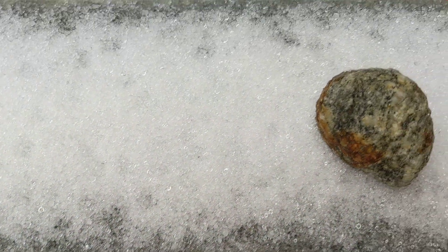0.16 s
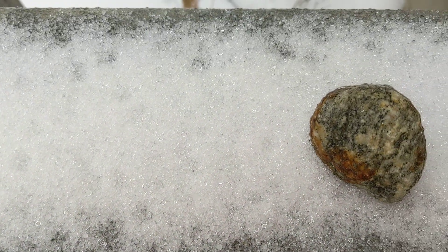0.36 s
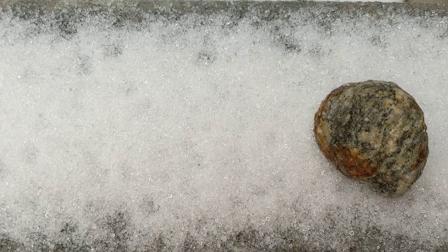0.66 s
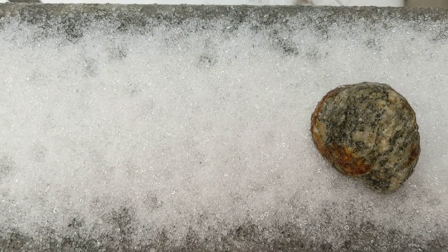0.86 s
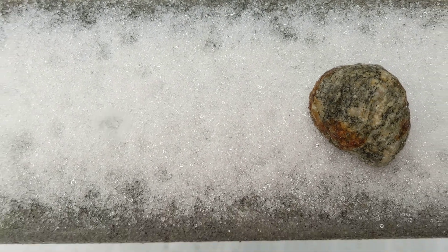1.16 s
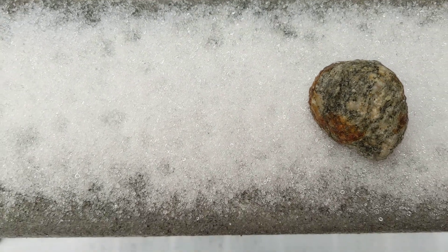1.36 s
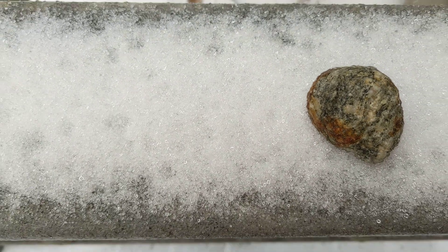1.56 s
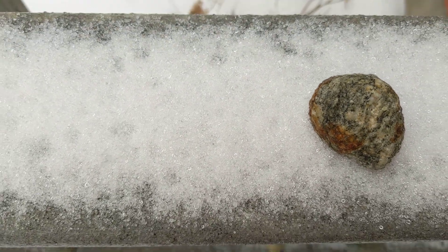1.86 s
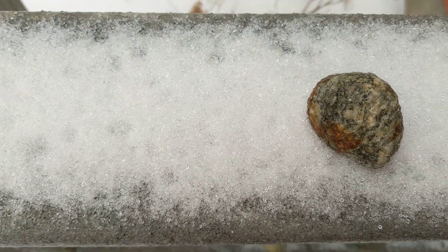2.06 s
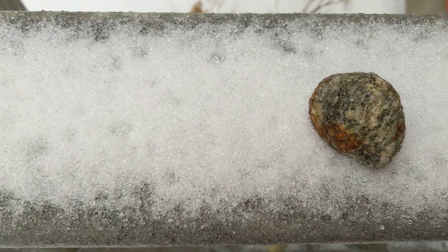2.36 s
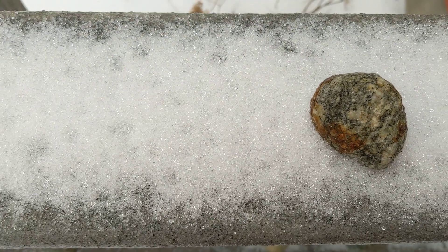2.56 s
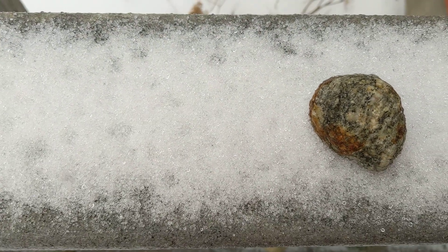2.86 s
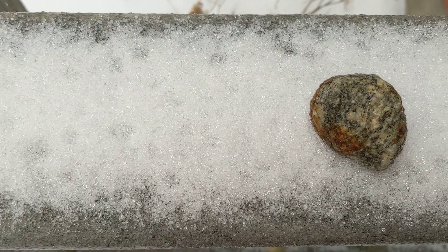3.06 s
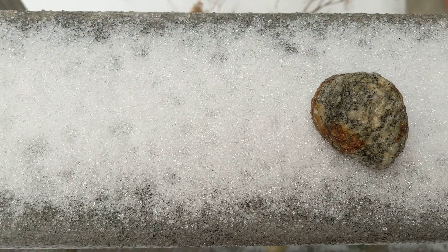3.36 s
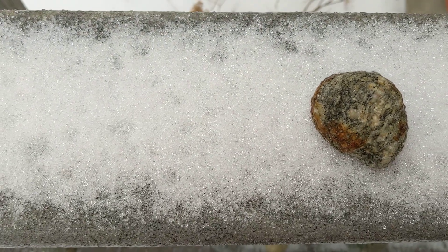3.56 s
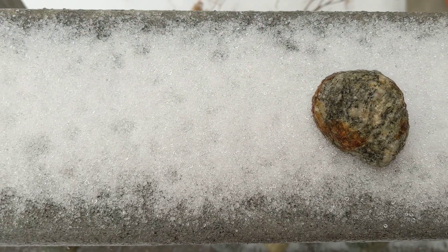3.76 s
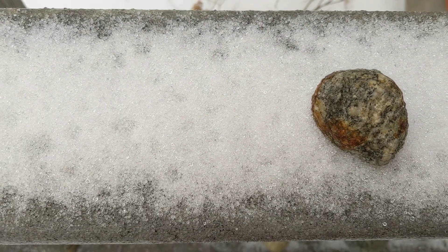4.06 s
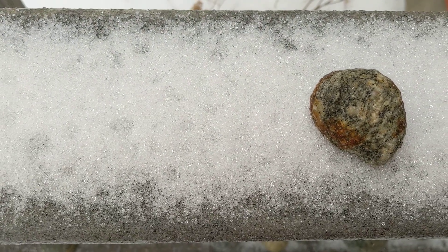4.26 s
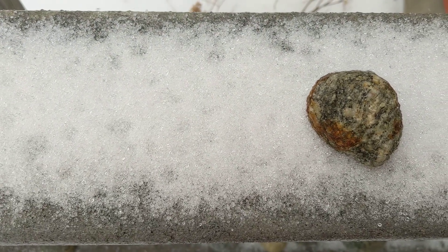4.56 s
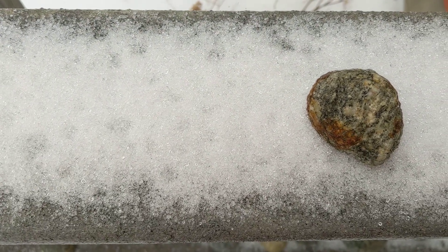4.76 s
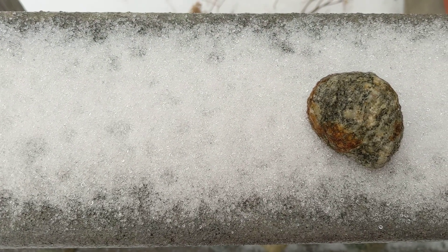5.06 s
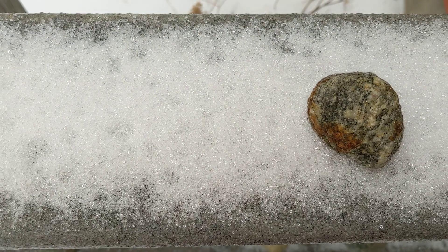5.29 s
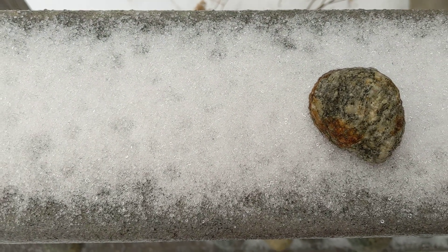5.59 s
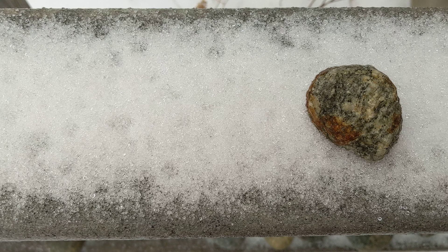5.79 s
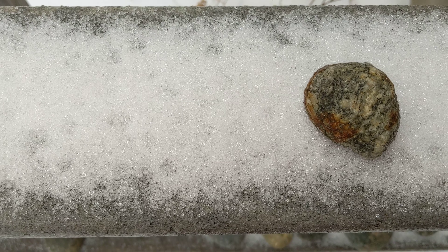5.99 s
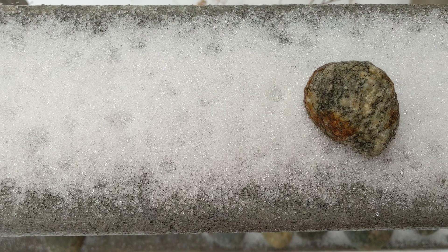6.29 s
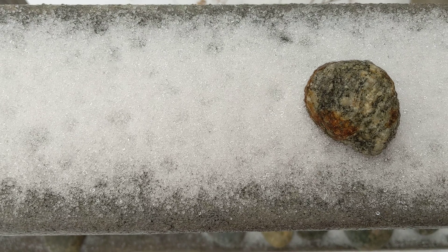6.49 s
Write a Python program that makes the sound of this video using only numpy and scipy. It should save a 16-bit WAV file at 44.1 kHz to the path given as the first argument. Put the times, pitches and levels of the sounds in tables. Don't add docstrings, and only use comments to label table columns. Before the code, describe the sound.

A quiet snowy wood in sleet, in close stereo from a hand-held microphone. Throughout, a thin, steady, bright hiss of far pellets mixes with fine patter, over a soft low air rumble. From the start, sharp dry ticks snap irregularly, mostly left, some with small hollow knocks on the case; a loud one comes at 0.8 s. At 1.46 and 1.57 s hard blows crack and thump the microphone, another bright tick lands at 1.9, and the heaviest jolt, deep and abrupt, comes at 2.4, followed by clicks at 2.54 and 2.7. A clear tick at 3.2 opens a sparser stretch with light clicks, some at right. A distant low engine drone gradually emerges, strongest after 4.5 s, with faint tyre whine around 5.2 s and at the end. Around 5.3-5.55 s ticks cluster and the grip shifts with dull bass thuds; another thud at 6.27 precedes a crunchy, shattering tick at 6.43.

```python
import sys
import numpy as np
from scipy import signal
from scipy.fft import rfft, irfft, next_fast_len
from scipy.io import wavfile
from scipy.ndimage import uniform_filter1d, map_coordinates

SR = 44100
rng = np.random.default_rng(int(sys.argv[2]) if len(sys.argv) > 2 else 0)


def wav_out(sig):
    wavfile.write(sys.argv[1], SR, np.round(np.clip(np.atleast_2d(sig).T, -1, 1) * 32767).astype(np.int16))


def ratio_of_db(decibels):
    return 10 ** (np.asarray(decibels, float) / 20)


N = 292383
TIME = np.arange(N) / SR


def unit(x):
    return x / np.sqrt(np.mean(x ** 2) + 1e-20)


def along(points, hz):
    f, v = np.transpose(points)
    return np.interp(np.log(hz + 1), np.log(f + 1), v)


def curves(rows):
    s, *columns = np.transpose(rows)
    return [np.interp(TIME, s, column) for column in columns]


def wobble(rate):
    return map_coordinates(rng.standard_normal(int(N * rate / SR) + 4), [TIME * rate])


def filtered(x, response):
    n = x.shape[-1]
    m = 2 * next_fast_len(n // 2 + SR // 10)
    return irfft(rfft(x, m) * response(np.fft.rfftfreq(m, 1 / SR)), m)[..., :n]


def modes(table, order=1):
    def response(f):
        power = 0
        for centre, width, *db in table:
            damping = (f * width) ** 2
            peak = damping / ((centre * centre - f * f) ** 2 + damping)
            power = power + ratio_of_db(db)[:, None] ** 2 * peak ** order
        cepstrum = irfft(np.log(power + 1e-9))
        cepstrum[:, 0] /= 2
        cepstrum[:, len(f):] = 0
        return np.exp(rfft(cepstrum, 2 * len(f) - 2))
    return response


def loudness_one(response):
    def scaled(f):
        r = response(f)
        size = np.sqrt(np.mean(abs(r) ** 2, axis=1, keepdims=True))
        return abs(r) * np.exp(.4j * np.angle(r)) / size
    return scaled


def patchy(patchy_db):
    z = signal.stft(rng.standard_normal((2, N + 512)), nperseg=512)[2]
    field = rng.standard_normal(z.shape[1:])
    field = uniform_filter1d(uniform_filter1d(field, size=8, axis=0), size=8, axis=1)
    return signal.istft(z * ratio_of_db(patchy_db * unit(field)), nperseg=512)[1][:, :N]


def burst(length_ms):
    t = np.arange(SR // 25) / SR
    x = rng.standard_normal((2, len(t))) * np.exp(-t / (max(length_ms, .03) / 1000))
    return x / np.linalg.norm(x, axis=1, keepdims=True)


# [f/Hz, width/Hz, left level/dB, right level/dB]
LOW_RING = [(2300, 500, -6, -9), (3335, 560, -2.5, -5.5), (4040, 760, -4.5, -5.5)]
PORT_RING = [(5720, 670, 0.5, -3.5)]
HIGH_RING = [(7475, 710, 0, -3.5), (9650, 1270, 1, -2), (11670, 680, 2, -9.5), (13500, 1100, -7.5, -8),
             (14900, 1450, -3, -8)]


def sleet():
    groups = LOW_RING, PORT_RING, HIGH_RING
    start, size, sign, side, kind = rng.random((2600, 5)).T
    sizes = ratio_of_db(5.6 * -np.log(1 - .95 * size)) * np.sign(sign - .5)
    pan_db = 30 * (side - .45)
    kind, at = (3 * kind).astype(int), (start * N).astype(int)
    patter = np.zeros((3, 2, N))
    patter[kind, 0, at] = sizes * ratio_of_db(np.minimum(pan_db, 0))
    patter[kind, 1, at] = sizes * ratio_of_db(np.minimum(-pan_db, 0))
    crush = burst(0.98)
    shares = ratio_of_db([[2, -2.5, -5], [-23, 2.5, -17], [-12, -2, 2.0]])
    near = 0
    for share, ring in zip(shares, groups):
        near = near + filtered(np.tensordot(share, patter, axes=1), modes(ring))
    near = signal.fftconvolve(near, crush, axes=1)[:, :N]
    far = filtered(patchy(1.14), modes(LOW_RING + PORT_RING + HIGH_RING))
    fall_db = -47 + 0.29 * wobble(2.97) + 0.42 * wobble(12) + 0.62 * wobble(30)
    return ratio_of_db(fall_db) * (unit(far) + ratio_of_db(-6) * unit(near))


# [t/s, left level/dB, right level/dB, port ring level/dB, low ring level/dB]
TICKS = [(0.0703, -21, -41, -7, -14), (0.3554, -24.5, -41, -10, -15), (0.3836, -19.5, -44, -10, -26),
         (.703, -28.5, -39, 4, 0), (.7964, -8.5, -34, -1.5, -19), (1.3987, -38, -26, -25, -24),
         (1.9035, -10, -29, -11, -19), (1.9446, -31, -29, -15, -10), (2.0356, -24.5, -39, 2.5, -6),
         (2.3373, -24, -42, -16, -15), (2.5426, -21.5, -12, 4, -1), (2.6849, -33, -27, -13, -4),
         (3.1824, -11.5, -42, -12, -9), (3.4448, -21.5, -42, -15, -10), (4.2654, -36, -22.5, -14, -15),
         (5.3168, -18.5, -43, -8, -14), (5.4548, -20, -34, -9, -18), (5.4929, -13.5, -42, -1.5, -29),
         (5.5473, -15.5, -42, -13, -21), (6.2197, -19.5, -45, -15, -20)]
BLOW_TICKS = [
    (1.461, -19, -21, -17, -7.5),
    (1.5683, -5.5, -21, 9.5, -8),
    (2.4135, -23, -12.5, -12, -4),
]
# [t/s, left level/dB, right level/dB, port ring level/dB, length/ms]
SHATTERS = [(0.042, -34, -41, -8, 2.5), (0.4585, -31, -42, -8, 1.9), (1.272, -40, -36, -13, 1.5),
            (1.2797, -25.5, -37, -11, 1.8), (1.6748, -29, -45, -9, 1.1), (1.956, -27.5, -39, -7, 2.2),
            (2.644, -37, -39, 0, 1.9), (3.4335, -36, -38, 1, 1.7), (5.2157, -36, -39, -19, 2.3),
            (5.4083, -33, -36, -6, 1.3), (6.4277, -19.5, -26, -6, 3.3), (6.4297, -23.5, -31, -2, 2.8),
            (6.4355, -37, -36, -8, 2.3)]
# [t/s, level/dB]
LEFT_TICKS = [(1.011, -30), (1.2493, -37), (1.5311, -33), (1.5401, -33), (1.6421, -32), (1.68, -28),
              (2.4864, -30), (2.552, -33), (2.663, -31), (2.6902, -31), (2.6935, -27), (2.7114, -30),
              (2.8348, -29), (2.8509, -35), (3.2098, -31), (3.2366, -34), (3.2926, -31), (3.8104, -39),
              (3.9606, -33), (4.57, -34), (5.0631, -32), (5.4764, -33), (5.7091, -31), (6.1547, -28.5),
              (6.1825, -28.5), (6.1968, -32), (6.2943, -28), (6.311, -29), (6.3487, -30), (6.4814, -26.5)]
RIGHT_TICKS = [(.4441, -37), (.7467, -34), (.8923, -31), (3.1477, -39), (3.6433, -38), (3.6623, -42),
               (4.2938, -39), (4.3477, -37), (4.3833, -30), (4.4303, -42), (4.4994, -31), (4.6301, -39),
               (5.6586, -31), (6.299, -30), (6.4627, -37), (6.5744, -31)]
BOUNCE_MS, LIGHT_MS, BLOW_MS = 0.64, .75, 1.14
RIGHT_SHADOW_DB, LEFT_SHADOW_DB = -18, -9
PORT_SHARE_DB, LOW_SHARE_DB, SHARE_SCATTER_DB = -10.5, -11, 1.5


def pellets():
    light = [(s, db, db + RIGHT_SHADOW_DB) for s, db in LEFT_TICKS]
    light += [(s, db + LEFT_SHADOW_DB, db) for s, db in RIGHT_TICKS]
    shares = [PORT_SHARE_DB, LOW_SHARE_DB] + SHARE_SCATTER_DB * rng.standard_normal((len(light), 2))
    hits = [(*row, BOUNCE_MS) for row in TICKS]
    hits += [(*row, BLOW_MS) for row in BLOW_TICKS]
    hits += [(*row, LOW_SHARE_DB, ms) for *row, ms in SHATTERS]
    hits += [(*row, *share, LIGHT_MS) for row, share in zip(light, shares)]
    return hits


def crack(ms):
    x = np.clip(2.4 * (ms - .5), .15, 6) * burst(ms - .25)
    x = np.roll(x, 24, axis=1)
    x[:, :24] = .04 * rng.standard_normal((2, 24))
    x[:, 1] += .15
    x[:, 24] += 1
    return rng.choice([-1, 1]) * x / np.linalg.norm(x, axis=1, keepdims=True)


# [f/Hz, width/Hz, left level/dB, right level/dB]
RIGHT_EDGE = [(14500, 3500, -20, -5)]


def ticks():
    strikes = np.zeros((3, 2, N + SR))
    for s, left_db, right_db, port_db, low_db, ms in pellets():
        share = ratio_of_db([low_db, port_db, 0])
        share = share / np.linalg.norm(share)
        size = ratio_of_db([[left_db + 13], [right_db + 14]]) * np.sqrt(ms)
        start = round((s - .0001 - .0003 * ms) * SR)
        strikes[..., start:][..., :SR // 25] += share[:, None, None] * size * crack(ms)
    port = modes([(5720, 750, 0, 0)], order=2)
    colours = modes(LOW_RING), port, modes(HIGH_RING + RIGHT_EDGE)
    return sum(filtered(x, loudness_one(colour)) for x, colour in zip(strikes[..., :N], colours))


# [t/s, level/dB]
KNOCKS = [(0.0703, -34.5), (.1639, -38), (.2674, -45), (0.3556, -29.5), (.3854, -33.5), (.4587, -42),
          (.4777, -37), (0.7985, -37), (.8522, -31.5), (.8932, -40), (.9723, -39), (1.3987, -35.5),
          (1.5682, -17), (1.6796, -39), (1.9035, -25), (1.9443, -35), (2.542, -17.5), (2.8565, -42),
          (3.1818, -31), (3.892, -39), (4.2935, -39), (4.4157, -39), (4.9638, -35.5), (5.3162, -36),
          (5.548, -39), (5.6586, -37), (6.076, -42), (6.1787, -35), (6.2944, -38), (6.4813, -30.5)]
FAR_END_DB = -7


def case():
    taps = np.zeros((2, N))
    for s, left_db in KNOCKS:
        taps[0, round(s * SR)] = -ratio_of_db(left_db + 31)
        taps[1, round((s + .00025) * SR)] = ratio_of_db(left_db + FAR_END_DB + 28.5)
    body = modes([(380, 300, -13, -13), (780, 500, 0, 0), (1500, 400, -26, -26)], order=2)
    return filtered(taps, lambda f: body(f) / (1 + 1j * f / 1500))


# [t/s, push, ring, ring delay/ms, rebound], full scale 1
LEFT_BLOWS = [
    (1.46144, -.16, 0.14, 0.47, -0.059),
    (1.5687, 0.018, 0.024, .022, .08),
    (2.4147, 0.18, .087, 0.41, 0.17),
    (2.685, 0.037, 0.042, .083, 0.0016),
]
RIGHT_BLOWS = [
    (1.46113, 0.23, 0.15, 0.22, -.18),
    (1.5686, -0.026, -0.058, 0, 0.011),
    (2.4146, -0.28, -.062, .27, .08),
    (2.685, -.076, -0.026, 0.23, 0.1),
]
BLOW_RING_HZ = 624


def blows():
    out = np.zeros((2, N))
    # ear, table, push length in s, fade of the rebound per s
    for ear, table, push_s, fade in ((0, LEFT_BLOWS, .0005, 250), (1, RIGHT_BLOWS, .00031, 600)):
        for s, push, ring, delay_ms, rebound in table:
            u = np.maximum(TIME - s, 0)
            v = np.maximum(TIME - s - delay_ms / 1000, 0)
            out[ear] += push * np.exp(-((TIME - s) / push_s) ** 2)
            out[ear] += ring * np.exp(-550 * v) * np.sin(2 * np.pi * BLOW_RING_HZ * v)
            out[ear] += rebound * (1 - np.exp(-2000 * u)) * np.exp(-fade * u)
    return out


# [t/s, left, right], full scale 1
JOLTS = [
    (1.461, -0.2, -0.36),
    (1.5682, .27, 0.18),
    (1.9035, -0.084, -0.021),
    (2.4149, 0.72, 1.18),
    (2.685, -.066, -0.12),
]


def jolts():
    out = np.zeros((2, N))
    for s, left, right in JOLTS:
        u = np.maximum(TIME - s, 0)
        settling = np.exp(-25.5 * u) * (np.cos(15.3 * u) - 1.26 * np.sin(14.0 * u))
        out += np.outer([left, right], settling - np.exp(-94 * u))
    return out


# [t/s, level/dB, f/Hz, length/ms]
PATS = [(.252, -44, 1760, 9.9), (.259, -46, 1290, 12), (.702, -42, 1800, 3.2), (.865, -42, 1750, 3.3),
        (1.4608, -33, 2600, .8), (1.5685, -36, 1500, 1.5), (3.148, -43, 3400, 2.5), (6.428, -42, 2880, 12),
        (6.428, -49, 1100, 6), (6.428, -42, 4270, 6.3)]


def pats():
    out = np.zeros((2, N + SR))
    for s, db, hz, ms in PATS:
        puff = ratio_of_db(db + 30.5) * np.sqrt(ms) * burst(ms)
        hollow = modes([(hz, .5 * hz, 0, -4)], order=2)
        out[:, round(s * SR):][:, :SR // 25] += filtered(puff, hollow)
    return out[:, :N]


# [t/s, level/dB, f/Hz]
THUDS = [
    (5.49, -29.5, 55.3),
    (5.548, -35, 45),
    (5.585, -31, 56),
    (6.271, -30.5, 50),
    (6.43, -48, 60),
]


def thuds():
    out = np.zeros((2, N))
    for s, db, hz in THUDS:
        u = (TIME - s) * hz
        out -= ratio_of_db(db) * np.cos(2 * np.pi * u) * np.exp(-(u / .7) ** 2)
    return out


# [t/s, level/dB]
ENGINE = [(0, -70), (.5, -62.5), (2.2, -54), (3.14, -51), (3.47, -50.5), (3.64, -48.5), (4.73, -46),
          (4.91, -49), (5.26, -47.5), (5.54, -51.5), (6.33, -47), (6.63, -47.5)]
# [t/s, f/Hz]
FIRING = [(0, 73.8), (1.4, 74.3), (3.5, 74.8), (4.7, 75), (5, 76), (6.63, 76.3)]
OVERTONES_DB = -18


def engine():
    db, = curves(ENGINE)
    turn = 2 * np.pi * np.cumsum(curves(FIRING)[0]) / SR + .2 * wobble(7)
    tone = ratio_of_db(1.27 * wobble(11)) * np.sin(turn)
    second = ratio_of_db(2.1 * wobble(6.5)) * np.sin(2 * turn)
    third = ratio_of_db(2.3 * wobble(6) - 6.5) * np.sin(3 * turn)
    return ratio_of_db(db + 5.5) * (tone + ratio_of_db(OVERTONES_DB) * (second + third))


# [t/s, level/dB]
WHINE = [(0, -74), (4.9, -77), (5.2, -65.5), (5.8, -70), (6.1, -73), (6.63, -65)]


def tyres():
    whine = filtered(rng.standard_normal((2, N)), modes([(1206, 88, 0, -2.2)], order=2))
    return ratio_of_db(curves(WHINE)[0]) * unit(whine)


# [f/Hz, likeness from -1 to 1]
ALIKE = [(60, 0.92), (130, 0.96), (290, 0.63), (640, 0.062), (1410, 0.091), (3100, -0.2), (6820, 0.0),
         (15000, -0.04)]
# [f/Hz, left minus right level/dB]
LEAN = [(60, 2), (180, 0.5), (550, 3.5), (1650, 3), (4970, -22), (15000, 4.5)]


def rush(spectrum, patchy_db):
    def colour(hz):
        turn = np.arccos(np.clip(along(ALIKE, hz), -1, 1)) / 2
        return ratio_of_db(along(spectrum, hz)) * [np.cos(turn), np.sin(turn)]
    mid, side = filtered(patchy(patchy_db), colour)
    ears = np.array([mid + side, mid - side])
    return unit(filtered(ears, lambda hz: ratio_of_db(np.outer([.5, -.5], along(LEAN, hz)))))


# [f/Hz, level/dB per Hz]
AIR = [(60, -120), (90, -8), (130, -1.5), (390, -1.5), (700, -7.5), (1070, -12), (1800, -17), (3000, -30),
       (6000, -120)]
BUFFET = [(8, -120), (18, -7.5), (45, -3), (58, -3), (90, -10.5), (120, -24.5), (200, -120)]
# [t/s, level/dB]
WIND = [(0, -57.5), (1, -59.5), (2.3, -59.5), (2.8, -57.5), (4, -57), (5.1, -56), (5.6, -55.5),
        (6.63, -55.5)]
BUFFET_DB, BUFFET_RISE_DB_PER_S = -62.5, 1.18
BUFFET_GROWS = 0.66


def air():
    wind_db, = curves(WIND)
    rumble = ratio_of_db(wind_db + 3 + 0.45 * wobble(3.89)) * rush(AIR, patchy_db=1.5)
    buffet_db = BUFFET_DB + BUFFET_RISE_DB_PER_S * TIME + BUFFET_GROWS * (wind_db - wind_db.mean())
    return rumble + ratio_of_db(buffet_db + 6 + 2.1 * wobble(5)) * rush(BUFFET, patchy_db=-0.5)


def scene():
    strikes = ticks() + case() + blows() + jolts()
    return sleet() + strikes + pats() + thuds() + engine() + tyres() + air()


def below(top_hz, width_hz):
    return lambda hz: np.clip((top_hz - hz) / width_hz + .5, 0, 1)


def low_pass(x):
    return signal.sosfilt(signal.butter(12, 16990, fs=SR, output="sos"), x)


def record(dry):
    body = filtered(dry, below(15780, 60))
    top = filtered(dry - body, below(16550, 350))
    loud = uniform_filter1d(abs(top), size=22) > .0028
    passing = uniform_filter1d(1. * loud, size=44)
    x = body + np.minimum(3 * passing, 1) * top
    x = x / (1 + abs(x / .72) ** 6) ** (1 / 6)
    return low_pass(x)


dry = scene()
out = record(dry)
wav_out(out)
```